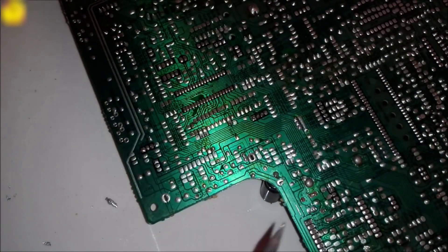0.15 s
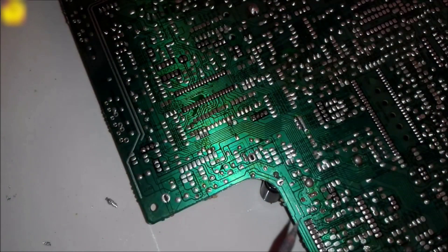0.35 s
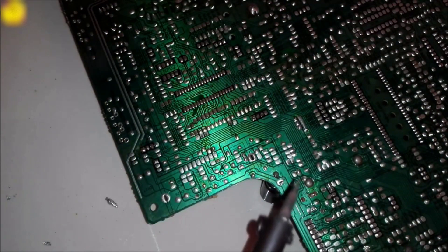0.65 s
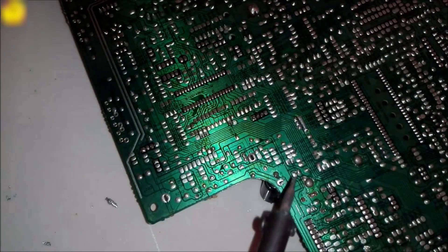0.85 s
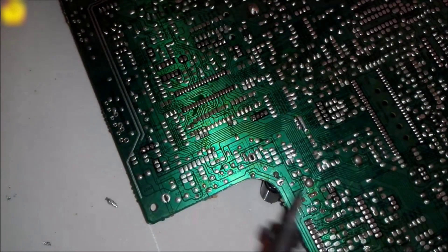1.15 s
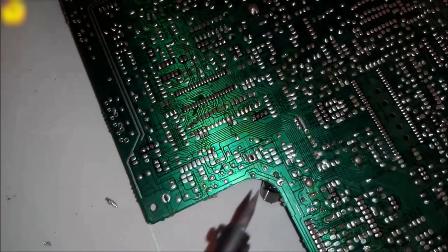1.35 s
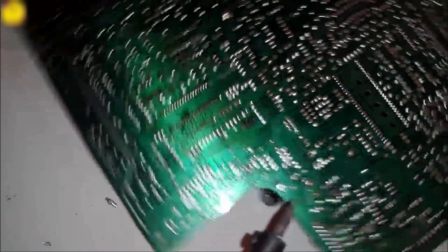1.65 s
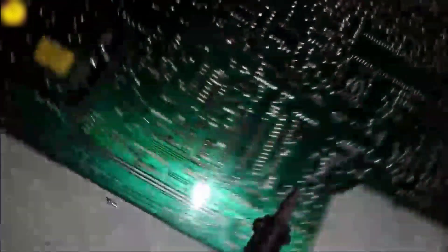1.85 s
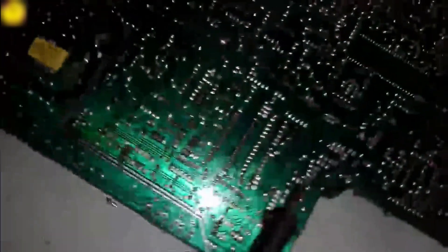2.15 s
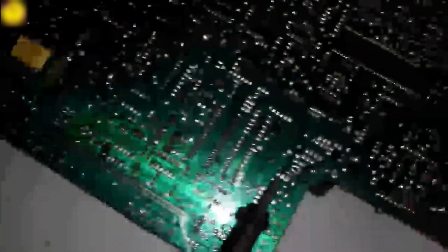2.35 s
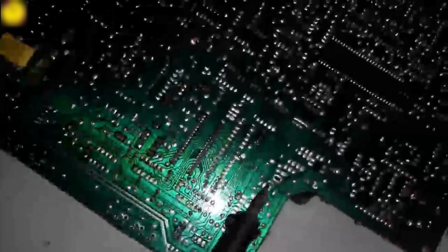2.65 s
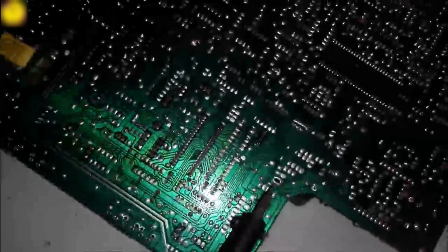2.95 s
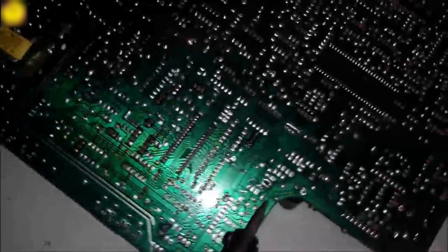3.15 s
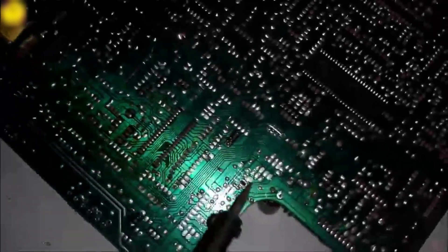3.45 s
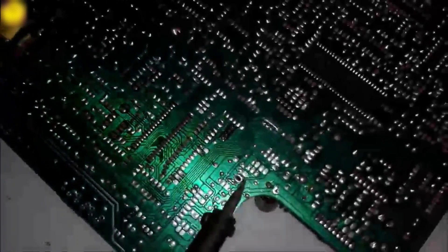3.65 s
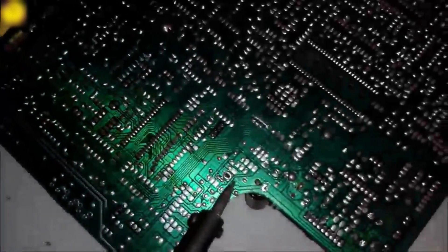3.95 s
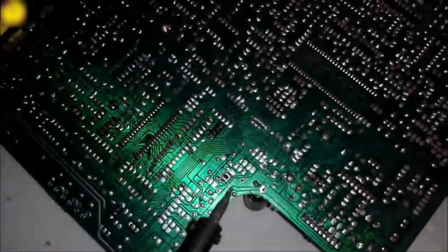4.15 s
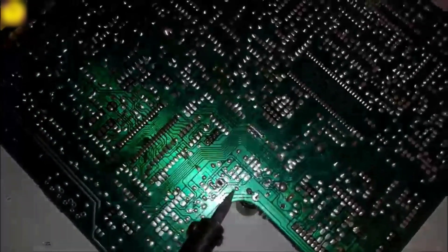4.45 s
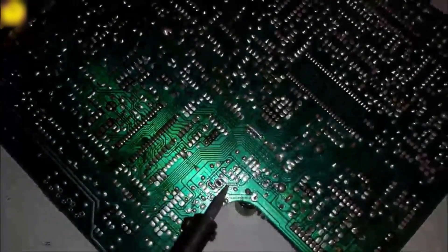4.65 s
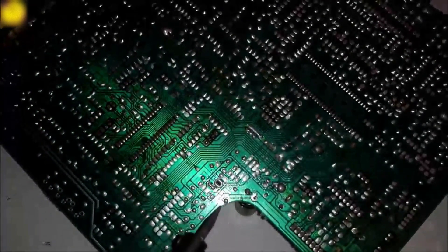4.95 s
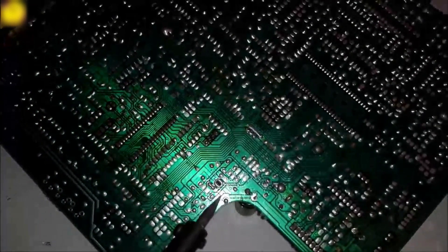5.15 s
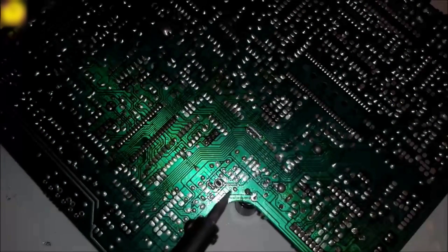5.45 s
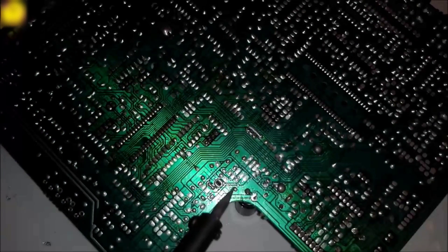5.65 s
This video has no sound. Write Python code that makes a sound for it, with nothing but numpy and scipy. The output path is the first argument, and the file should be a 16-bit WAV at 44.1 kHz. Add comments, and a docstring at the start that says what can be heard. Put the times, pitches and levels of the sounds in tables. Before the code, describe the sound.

A close recording at a workbench in a small room with short reflections, low rumble and faint hiss. From 0.15 s a spring-loaded desoldering pump makes small hollow clicks; it latches with a bright, dry snap at 0.33 s, and its piston hits the stop at 0.53 s after a tiny rush, followed by springy rattles fading by about 1.05 s. A single tap comes at 1.47 s. From 1.68 s a circuit board is swung round: two knocks, then at 1.80 s a brief wavering squeal near 1.2 kHz breaks into a low groan, falling chirp and gritty scrape, with the strongest crack at 1.87 s. Soft rubbing and a light tap follow. A hard ringing snap thumps the bench at 2.39 s. Faint sliding and singing come around 2.9 to 3.3 s. Another snap at 3.64 s is followed by three weaker, duller ones until 4.0 s. Uneven taps run from 4.39 to 4.77 s, then only rumble and hiss.

```python
"""A spring-loaded desoldering pump is cocked and latches close to the microphone, at a bench in a small room.
Its clicks are noise bursts through barrel resonances, with ringing spring modes. A circuit board is then swung
round on the bench: wavering tones squeal and groan, and random tiny slips make the scrape. Hard snaps, taps and
sharp slips ring board modes as decaying sines and thump the bench, over a low rumble and faint hiss of filtered noise."""
import sys
import numpy as np
from scipy import signal
from scipy.fft import rfft, irfft, next_fast_len
from scipy.io import wavfile
from scipy.ndimage import uniform_filter1d, minimum_filter1d

SR = 44100
rng = np.random.default_rng(int(sys.argv[2]) if len(sys.argv) > 2 else 0)


def generate_wav(sig):
    """Save sig (samples, or channels by samples) to the path in sys.argv[1] as 16-bit PCM at SR."""
    pcm = np.round(np.clip(np.atleast_2d(sig).T, -1, 1) * 32767).astype(np.int16)
    wavfile.write(sys.argv[1], SR, pcm)


N = 255339
TIME = np.arange(N) / SR  # seconds into the scene
AGE = TIME[:SR // 2]  # seconds since a blow


def from_db(db):
    """Turn dB into a plain gain."""
    return 10 ** (np.asarray(db) / 20)


def at_hz(points, hz):
    """Read a table on a log-frequency axis."""
    f, value = np.transpose(points)
    return np.interp(np.log(np.maximum(hz, 1)), np.log(f), value)


def rms_one(x):
    """Scale a sound to an rms of 1."""
    return x / np.sqrt(np.mean(x ** 2) + 1e-20)


def add(track, s, sound):
    """Mix a sound in at a time in seconds."""
    start = round(s * SR)
    track[start:start + len(sound)] += sound[:N - start]


def colour(x, spectrum):
    """Causal (minimum-phase) filter with the given dB spectrum."""
    size = 2 * next_fast_len(len(x))
    log_gain = np.log(from_db(at_hz(spectrum, np.fft.rfftfreq(size, 1 / SR))))
    cepstrum = irfft(log_gain)
    # folding the cepstrum forward in time makes the phase minimal
    cepstrum[1:size // 2] *= 2
    cepstrum[size // 2 + 1:] = 0
    response = np.exp(rfft(cepstrum))
    return irfft(rfft(x, size) * response)[:len(x)]


def cut(x, hz, kind, order=2):
    """Low- or high-pass."""
    sos = signal.butter(order, min(hz, .45 * SR), kind, fs=SR, output="sos")
    return signal.sosfilt(sos, x + 1e-18)


def boost(x, hz, gain_db, q):
    """Raise or lower one resonance."""
    b, a = signal.iirpeak(hz, q, fs=SR)
    return x + (from_db(gain_db) - 1) * signal.lfilter(b, a, x + 1e-18)


def flatten(x, width_hz):
    """Even out the spectrum of a burst."""
    spectrum = rfft(x)
    power = uniform_filter1d(abs(spectrum) ** 2, size=max(3, int(width_hz * len(x) / SR)))
    return irfft(spectrum / np.sqrt(power), len(x))


def ring(modes, scatter_db):
    """Decaying sines; each blow feeds each mode a little differently."""
    total = 0
    for k, (hz, db, t60) in enumerate(modes):
        level_db = db + scatter_db * rng.normal() - 60 * AGE / t60
        total = total + (-1) ** k * from_db(level_db) * np.sin(2 * np.pi * hz * AGE)
    return total


def crack(t60):
    """A contact and its dense dying rattle, with a nearly even spectrum and unit energy."""
    fade = from_db(-60 * AGE / t60)
    burst = rng.standard_normal(len(AGE)) * fade
    for _ in range(3):
        burst = flatten(burst, 150) * fade ** .15  # flattening smears the burst, so fade it again
    return burst / np.linalg.norm(burst)


def noise(spectrum):
    """Steady coloured noise of rms 1."""
    return rms_one(colour(rng.standard_normal(N), spectrum))


def friction(spectrum, slips_per_s, spread_db):
    """Many tiny slips of random timing, direction and uneven size; rms 1."""
    slipping = rng.random(N) < slips_per_s / SR
    direction = rng.choice([-1, 1], N)
    slips = slipping * direction * from_db(spread_db * rng.standard_normal(N))
    return rms_one(colour(slips, spectrum))


def tone(hz, waver):
    """A stick-slip oscillation with an unsteady pitch; waver is its rms share of the pitch."""
    wander = rms_one(cut(rng.standard_normal(N), 122, "low"))
    return np.sin(2 * np.pi * np.cumsum(hz * (1 + waver * wander)) / SR)


def sag(s, hz, octaves_per_s):
    """A pitch that falls steadily through hz at time s, within an octave either way."""
    return hz * 2 ** np.clip(octaves_per_s * (s - TIME), -1, 1)


def swell(rows, rise_db_per_s, fall_db_per_s):
    """Gain of strokes: each rises to its level at its time, holds and dies away; the strongest leads."""
    strokes = []
    for s, hold, db in rows:
        rise = rise_db_per_s * np.maximum(s - TIME, 0)
        fall = fall_db_per_s * np.maximum(TIME - s - hold, 0)
        strokes.append(db - rise - fall)
    return from_db(np.max(strokes, axis=0))


# Bench rumble. Each row: frequency in Hz, level in dB.
RUMBLE_COLOUR = [(12, -32), (20, -3.5), (49, 0), (66, -5), (85, -17.5), (107, -10.5), (235, -24),
                 (278, -21), (414, -33.5), (600, -45), (780, -66.5), (1320, -120)]
# Faint hiss. Each row: frequency in Hz, level in dB.
HISS_COLOUR = [(220, -33.5), (380, -5.5), (986, -5), (1130, -5.5), (1340, -3), (2300, -11), (2720, -8.5),
               (3880, -12), (13100, -15.5), (15000, -24.5)]
# Jostling of the bench. Each row: time in seconds, hold in seconds, rumble level in dB.
JOSTLES = [(1.84, 0.088, -52), (2.39, 0.14, -56.5), (3.1, .2, -57.5), (3.68, .22, -50)]
RUMBLE_DB, HISS_DB = -58.5, -73.5
JOSTLE_RISE_DB_PER_S, JOSTLE_FALL_DB_PER_S = 60, 48


def background():
    """The bench rumbles steadily and more while it is jostled, over a faint hiss."""
    jostling = swell(JOSTLES, JOSTLE_RISE_DB_PER_S, JOSTLE_FALL_DB_PER_S)
    shaking = np.hypot(from_db(RUMBLE_DB), jostling)
    rumble = shaking * cut(noise(RUMBLE_COLOUR), 33, "high", order=3)
    hiss = colour(noise(HISS_COLOUR), SUPPRESS)  # shaped by the suppressor's curve, upside down
    return rumble + from_db(HISS_DB) * hiss


# Fading of the room's bands. Each row: frequency in Hz, t60 in seconds before a slight extra fade.
ROOM_T60 = [(100, 0.56), (300, 0.46), (1000, 0.24), (3000, 0.37), (6000, 0.24), (13000, 0.14)]
# Strength of the reflections. Each row: frequency in Hz, level in dB.
ROOM_COLOUR = [(100, -10.5), (400, -7), (1200, -11), (3000, -12.5), (6000, -11), (14000, -14.5)]


def room(x, build_s=.005):
    """Diffuse reflections build up quickly and die away band by band."""
    edges, tail = np.geomspace(60, 16000, 13), 0  # band edges in Hz
    ending = np.interp(AGE, [.28, .4], [1, 0])
    onset = 1 - np.exp(-(AGE / build_s) ** 2)
    for low, high in zip(edges, edges[1:]):
        hz = np.sqrt(low * high)
        fade = from_db(-60 * AGE / at_hz(ROOM_T60, hz))
        echoes = flatten(rng.standard_normal(len(AGE)) * fade * onset, 24)
        echoes = echoes * fade ** .1 * onset * ending
        sos = signal.butter(2, [low, high], "band", fs=SR, output="sos")
        band = signal.sosfilt(sos, echoes / np.linalg.norm(echoes))
        tail = tail + band * from_db(at_hz(ROOM_COLOUR, hz))
    return signal.fftconvolve(x, tail)[:N]


# Strokes of the board eased along the bench. Each row: time in seconds, hold in seconds, level in dB.
RUBS = [(1.68, 0.066, -52.5), (1.92, 0.13, -51.5), (2.4, 0.24, -76), (3.17, 0.038, -72.5),
        (3.345, 0.021, -64.5)]
# Rustle of the rub. Each row: frequency in Hz, level in dB.
RUB_COLOUR = [(170, -1.5), (280, 1.5), (480, -14), (750, -3), (950, -1), (1200, 2.5), (1700, -6.5),
              (2200, -16.5), (4500, -16.5), (9000, -28)]
RUB_RISE_DB_PER_S, RUB_FALL_DB_PER_S = 124, 124
SING_S, SING_DB, SING_RISE_DB_PER_S, SING_FALL_DB_PER_S = 2.9, -74.5, 124.5, 36
SING_HZ, SING_SAG_OCTAVES_PER_S = 859, 0.081


def rub():
    """Slow sliding rustles, and sings faintly on two harmonics that sag in pitch."""
    rustle = swell(RUBS, RUB_RISE_DB_PER_S, RUB_FALL_DB_PER_S)
    rustle = rustle * friction(RUB_COLOUR, slips_per_s=1300, spread_db=4.0)
    hz = sag(SING_S, SING_HZ, SING_SAG_OCTAVES_PER_S)
    singing = tone(hz, waver=.004) + from_db(4.0) * tone(2 * hz, waver=0.0033)
    return rustle + swell([(SING_S, 0, SING_DB)], SING_RISE_DB_PER_S, SING_FALL_DB_PER_S) * singing


# Squeals of the sticking board. Each row: time in seconds, hold in seconds, level in dB.
SQUEALS = [(1.806, 0.017, -22), (1.829, .018, -12.5), (1.887, 0.0024, -22), (1.912, 0.036, -42)]
# Its low groans. Each row: time in seconds, hold in seconds, level in dB.
GROANS = [(1.852, 0.029, -30.5), (1.936, 0.0082, -39.5)]
# Colour of the scrape. Each row: frequency in Hz, level in dB.
SCRAPE_COLOUR = [(100, -12), (200, -2.5), (270, -6), (480, -18), (600, -17), (700, 2.5), (780, -13.5),
                 (920, -2.5), (1580, 1), (2100, -10), (3400, -6.5), (4200, -18.5), (5400, -7), (8000, -19),
                 (12000, -17.5), (15000, -32.5)]
DRAG_START_S = 1.803  # the board breaks loose
SQUEAL_HZ, SQUEAL_RISE_DB_PER_S, SQUEAL_FALL_DB_PER_S = 1176, 1501, 1900.5
GROAN_HZ, GROAN_RISE_DB_PER_S, GROAN_FALL_DB_PER_S = 351.5, 450.5, 801.5
# one falling chirp as the board slows
CHIRP_S, CHIRP_DB, CHIRP_FADE_DB_PER_S = 1.879, -21, 998.5
CHIRP_HZ, CHIRP_SAG_OCTAVES_PER_S = 915, 9
SCRAPE_S, SCRAPE_HOLD_S, SCRAPE_DB, SCRAPE_RISE_DB_PER_S, SCRAPE_FALL_DB_PER_S = 1.872, 0.011, -24.5, 281.5, 538


def drag():
    """The board sticks and slips: a clean squeal breaks up into a groaning scrape."""
    squeal = swell(SQUEALS, SQUEAL_RISE_DB_PER_S, SQUEAL_FALL_DB_PER_S) * tone(SQUEAL_HZ, waver=0.0081)
    groan = swell(GROANS, GROAN_RISE_DB_PER_S, GROAN_FALL_DB_PER_S) * tone(GROAN_HZ, waver=0.029)
    chirp = swell([(CHIRP_S, 0, CHIRP_DB)], CHIRP_FADE_DB_PER_S, CHIRP_FADE_DB_PER_S)
    chirp = chirp * tone(sag(CHIRP_S, CHIRP_HZ, CHIRP_SAG_OCTAVES_PER_S), waver=0.0098)
    scrape = swell([(SCRAPE_S, SCRAPE_HOLD_S, SCRAPE_DB)], SCRAPE_RISE_DB_PER_S, SCRAPE_FALL_DB_PER_S)
    scrape = scrape * friction(SCRAPE_COLOUR, slips_per_s=1100, spread_db=2.0)
    return (TIME > DRAG_START_S) * (squeal + groan + chirp + scrape)


# Bench modes. Each row: frequency in Hz, level in dB relative to the thump, t60 in seconds.
BENCH = [(56, -7, 0.37), (75.4, -2, 0.49), (111.93, -3.5, 0.87), (122.4, -0.5, 0.23), (169, -4.5, .25),
         (207.9, -3.5, 0.34), (243, -8.5, .2), (277, -8.5, 0.22), (341, -6, .15)]


def thump(swell_s=.008):
    """The heavy bench takes a moment to start moving."""
    return ring(BENCH, scatter_db=1.6) * (1 - np.exp(-AGE / swell_s))


# Taps on the board and sharp slips of the dragged board. Each row: start in seconds, level in dB,
# treble corner in Hz, contact resonance in Hz, its gain in dB.
TAPS_AND_SLIPS = [(1.4681, -4, 7220, 4960, 1), (1.6834, 0.5, 17450, 1397, 2), (1.7167, 2.5, 2672, 783, 8.5),
                  (1.8035, 1, 9080, 952, 14.5), (1.8280, -0.5, 8600, 1480, 11),
                  (1.8742, 10, 12000, 3430, 6), (1.8810, 4.5, 12070, 1603, 11.5),
                  (1.8865, 5, 11070, 847, 8.5), (2.018, -8, 5060, 1580, 2), (2.0466, -20.5, 3930, 3500, 12),
                  (2.8585, -22.5, 5470, 3990, 13.5), (3.036, -34.5, 2510, 1350, 7.5),
                  (4.39, -6.5, 12980, 5950, 11), (4.4835, 1.5, 7100, 1730, 3),
                  (4.5340, -12.5, 2970, 1915, -3), (4.5856, -13, 7880, 5000, 7),
                  (4.6746, -4, 5000, 5120, -0.5), (4.7670, -18, 5070, 4400, 8.5)]
# Colour of the contact. Each row: frequency in Hz, level in dB.
CONTACT_COLOUR = [(150, -3), (500, -17.5), (750, -4.5), (1000, 3), (1500, 4), (2100, -4), (2550, -10),
                  (3300, -7.5), (4200, -8.5), (5150, -2), (5700, -8), (9000, -9), (11000, -18),
                  (14000, -14)]
# Board modes they ring. Each row: mean frequency in Hz, level in dB relative to the ring, t60 in seconds.
CONTACT_MODES = [(917, -44, 0.079), (1147, -39.5, 0.27), (1316, -41.5, .1), (1503, -36, 0.084),
                 (1760, -42, .07), (2870, -49.5, 0.071), (3887, -46, .05), (4510, -44.5, 0.082),
                 (5150, -36, .035), (6200, -45.5, 0.055), (8720, -49.5, 0.03)]
CONTACT_Q = 8
CONTACT_THUMP_DB, CONTACT_THUMP_FOLLOWS = -52, 0.44  # thump under a 0 dB contact; dB of thump per dB of contact
CONTACT_RING_DB, CONTACT_DETUNE = -2, 0.018  # level of the ring; share by which pitches vary each time


def taps_and_slips():
    """Short knocks and slips, each with its own contact resonance; harder ones thump the bench more."""
    out = np.zeros(N)
    for s, db, treble_hz, contact_hz, contact_db in TAPS_AND_SLIPS:
        modes = [(hz * (1 + CONTACT_DETUNE * rng.normal()), mode_db, t60) for hz, mode_db, t60 in CONTACT_MODES]
        contact = colour(crack(t60=0.07), CONTACT_COLOUR)
        contact = contact + from_db(CONTACT_RING_DB) * ring(modes, scatter_db=1.5)
        contact = cut(boost(contact, contact_hz, contact_db, CONTACT_Q), treble_hz, "low")
        thump_db = CONTACT_THUMP_DB + CONTACT_THUMP_FOLLOWS * db
        add(out, s, from_db(db) * contact + from_db(thump_db) * thump())
    return out


# Hard snaps. Each row: start in seconds, level in dB, treble corner in Hz, bench thump in dB.
SNAPS = [(2.3854, 0.5, 12000, -38), (3.6415, -2, 12060, -42.5), (3.7672, -9, 7900, -48),
         (3.8732, -12, 7700, -51.5), (3.991, -15.5, 2990, -54)]
# Colour of their rattle. Each row: frequency in Hz, level in dB.
SNAP_COLOUR = [(100, -10), (350, -4), (620, -3.5), (900, 12.5), (1400, 5), (1620, 9.5), (2150, 4.5),
               (2950, 18), (4400, 6), (6300, 6), (9000, 1), (12000, -9.5), (14500, -7.5)]
# Board modes. Each row: frequency in Hz, level in dB relative to the snap, t60 in seconds.
BOARD = [(874, -27.5, 0.069), (1000, -24.5, 0.072), (1036, -19, 0.054), (1084.5, -17.5, 0.083),
         (1230, -25.5, 0.042), (1345, -31.5, 0.051), (1558, -23, 0.076), (1680, -27.5, 0.1015),
         (2000, -37.5, 0.089), (2439, -33, 0.078), (2817, -27, .1), (3000, -23, .06), (2924, -29, 0.1),
         (3327, -25.5, .07), (3660, -24, 0.04), (3890, -30, 0.14), (4480, -24, 0.025), (5180, -39, 0.052),
         (5347, -33, 0.11), (5850, -40.5, 0.091), (6170, -31, 0.081), (6495, -36, 0.027),
         (7300, -38, 0.067)]
RATTLE_T60_S = .075  # before the extra fades in crack()


def snaps():
    """Hard blows ring the board and thump the bench; the weakest are duller."""
    out = np.zeros(N)
    for s, db, treble_hz, thump_db in SNAPS:
        rattle = colour(crack(RATTLE_T60_S) + from_db(-5.0) * crack(t60=0.01), SNAP_COLOUR)
        snap = cut(rattle + ring(BOARD, scatter_db=0.5), treble_hz, "low")
        add(out, s, from_db(db) * snap + from_db(thump_db) * thump())
    return out


# Pump spring. Each row: frequency in Hz before the pair is split, level in dB, t60 in seconds.
SPRING = [(2720, -51.5, .2), (3700, -53.5, 0.19), (5440, -50.5, 0.23), (10150, -47.5, 0.097)]
SPRING_SPLIT = .02  # largest share by which a mode is detuned


def spring():
    """Paired modes beat against each other as the coil shivers."""
    pairs = []
    for hz, db, t60 in SPRING:
        for _ in range(2):
            pairs.append((hz * (1 + SPRING_SPLIT * rng.uniform(-0.69, 1)), db, t60))
    return ring(pairs, scatter_db=2.0) / np.sqrt(2)


# Small pump clicks. Each row: start in seconds, level in dB, bass edge in Hz, barrel resonance in Hz,
# its boost in dB, treble corner in Hz.
CLICKS = [(0.149, -22, 2530, 5200, 12, 13300), (0.1726, -5, 1390, 1580, 21, 6500),
          (0.301, -14.5, 854, 2400, 8, 4000), (0.3717, -16, 630, 730, 23, 976),
          (0.5254, -4.5, 1980, 5500, 2.5, 13000), (0.6, -20.5, 1503, 5740, 13, 9030),
          (0.708, -32.5, 3010, 5200, 6, 14250), (0.7757, -17.5, 2213, 2700, 0.5, 13900),
          (.829, -38.5, 4525, 10150, 12.5, 12870), (1.057, -35.5, 2540, 4990, 3.5, 8970)]
# Colour of the clicks. Each row: frequency in Hz, level in dB.
PUMP_COLOUR = [(200, -6), (450, -7.5), (850, -6), (1150, -4.5), (1600, 3), (2050, -7), (2600, -3.5),
               (3400, -4), (5200, 1), (7000, 0), (9000, 4.5), (10300, -7.5), (11500, 1.5), (15000, -0.5)]
# The catch latching. Each row: frequency in Hz, level in dB.
LATCH_COLOUR = [(200, -13.5), (650, -18.5), (860, 9), (1150, -0.5), (1600, 9.5), (2050, 8.5), (2700, 15),
                (4100, 9.5), (4900, 21), (6800, 11.5), (8500, 14.5), (10200, 10.5), (11500, 18), (14500, 0)]
# The piston hitting its stop. Each row: frequency in Hz, level in dB.
PISTON_COLOUR = [(200, -6), (450, 0), (880, 15.5), (1500, 12.5), (2000, 0), (2450, 9), (2900, 1.5),
                 (3450, 18.5), (4700, 10.5), (5200, 6), (5800, 9), (6700, 4.5), (9200, 10), (14000, 0.5)]
# The plunger sliding in its barrel. Each row: time in seconds, hold in seconds, level in dB.
SLIDES = [(.187, .03, -56), (.29, .16, -56), (.565, 0.035, -50)]
# Colour of that sliding. Each row: frequency in Hz, level in dB.
PLUNGER_COLOUR = [(290, -49.5), (500, -20), (704, -8.5), (2960, -19.5), (3510, -2), (6860, -4.5),
                  (9120, -7.5), (14400, -19), (15000, -32.5)]
LATCH_S, LATCH_DB = .3349, 1.1
PISTON_S, PISTON_DB = .5323, 1.5
STRIKE_T60_S = .0055  # this and the two below are before the extra fades in crack()
# a compressed spring holds the parts tight; once fired, they rattle and it rings freely (dB relative to the click)
TIGHT_T60_S, TIGHT_SPRING_DB = 0.0073, -18
LOOSE_T60_S, LOOSE_SPRING_DB = 0.067, 10.5
SLIDE_RISE_DB_PER_S, SLIDE_FALL_DB_PER_S = 1301.5, 191.5
# the released piston rushes up to its stop
RUSH_S, RUSH_DB, RUSH_RISE_DB_PER_S, RUSH_FALL_DB_PER_S = .531, -24, 2304, 3803


def pump(echo_s=0.0051, echo_db=-12):
    """Two hard strikes and small clicks that shake the spring; the bench top throws back one echo."""
    out = np.zeros(N)
    for s, db, spectrum in [(LATCH_S, LATCH_DB, LATCH_COLOUR), (PISTON_S, PISTON_DB, PISTON_COLOUR)]:
        strike = crack(STRIKE_T60_S) + from_db(-8.5) * crack(t60=0.037)
        add(out, s, from_db(db) * colour(strike, spectrum))
    for s, db, bass_hz, barrel_hz, barrel_db, treble_hz in CLICKS:
        tight = s < PISTON_S
        t60, spring_db = (TIGHT_T60_S, TIGHT_SPRING_DB) if tight else (LOOSE_T60_S, LOOSE_SPRING_DB)
        click = colour(crack(t60), PUMP_COLOUR)
        click = cut(click, bass_hz, "high", order=5)  # a small tube radiates little bass
        click = cut(boost(click, barrel_hz, barrel_db, q=2.5), treble_hz, "low")
        add(out, s, from_db(db) * (click + from_db(spring_db) * spring()))
    sliding = swell(SLIDES, SLIDE_RISE_DB_PER_S, SLIDE_FALL_DB_PER_S)
    rush = swell([(RUSH_S, 0, RUSH_DB)], RUSH_RISE_DB_PER_S, RUSH_FALL_DB_PER_S)
    out += (sliding + rush) * friction(PLUNGER_COLOUR, slips_per_s=2500, spread_db=2.5)
    echo = np.interp(TIME - echo_s, TIME, out)
    return out + from_db(echo_db) * echo


def scene(pump_room_db=-4.5):
    """All the work at the bench, heard in the room; the pump is closest, so driest."""
    near = pump()
    board = snaps() + taps_and_slips() + drag() + rub()
    reflections = room(from_db(pump_room_db) * near + board)
    return (near + board + reflections + background())[None]


# Noise suppressor. Each row: frequency in Hz, dB taken off faint sound (negative adds).
SUPPRESS = [(300, -0.5), (1200, -2), (3000, 4.5), (14000, 1.5)]


def suppress(x, knee_db):
    """Faint sound under a threshold is turned down in the treble and slightly raised below it."""
    hz, _, frames = signal.stft(x, SR, nperseg=512, noverlap=384)
    power = uniform_filter1d(abs(frames) ** 2, size=15, axis=0)  # smooth over frequency, then time
    power = uniform_filter1d(power, size=9, axis=1)
    faint = 1 / (1 + (power / from_db(knee_db) ** 2) ** 2)
    frames = frames * from_db(-at_hz(SUPPRESS, hz)[:, None] * faint)
    return signal.istft(frames, SR, nperseg=512, noverlap=384)[1][:N]


CUTOFF_HZ = 14350


def record(dry):
    """Noise suppressor, a fast limiter on the sharpest peaks, and the top is cut."""
    x = suppress(dry[0], knee_db=-84.5)
    gain = 1 / np.maximum(1, abs(x) / .9)
    gain = uniform_filter1d(minimum_filter1d(gain, size=41), size=41)  # hold, then smooth, about 1 ms each
    top_cut = signal.ellip(10, .1, 80, CUTOFF_HZ, fs=SR, output="sos")
    return signal.sosfilt(top_cut, gain * x)[None]


dry = scene()
out = record(dry)
generate_wav(out)
```